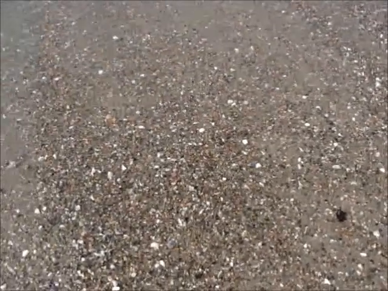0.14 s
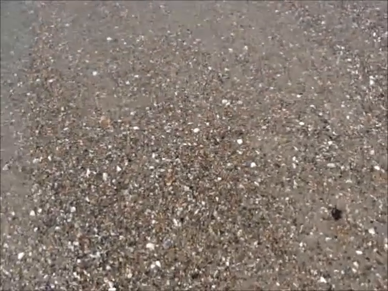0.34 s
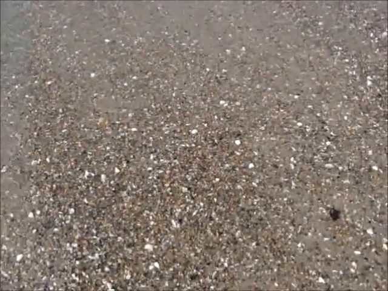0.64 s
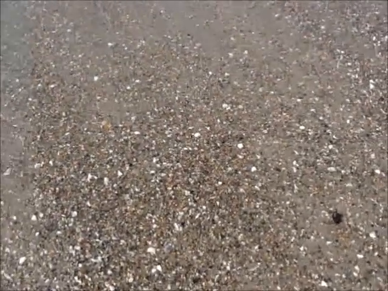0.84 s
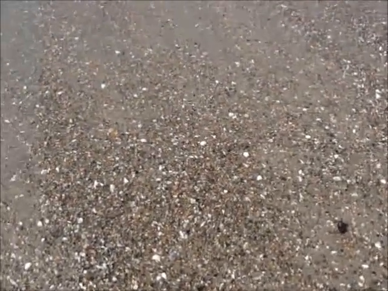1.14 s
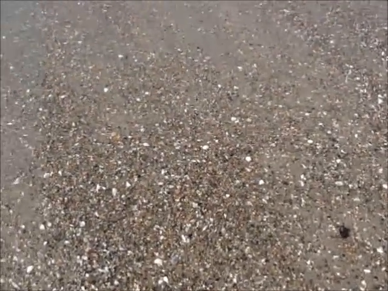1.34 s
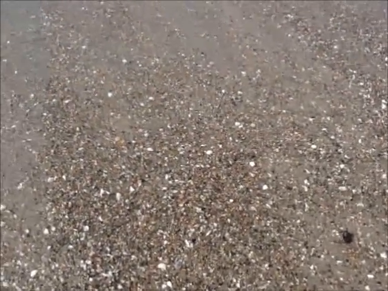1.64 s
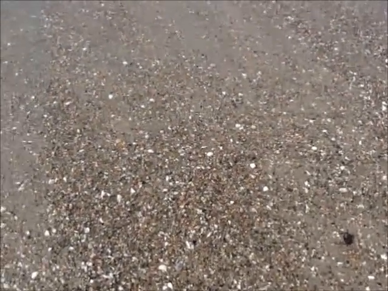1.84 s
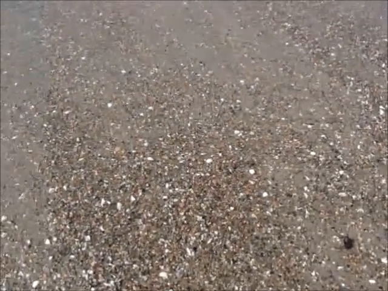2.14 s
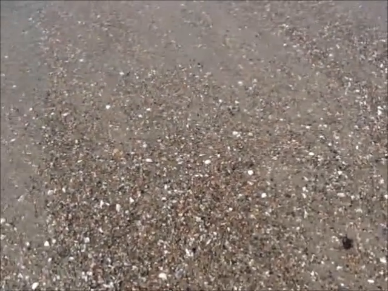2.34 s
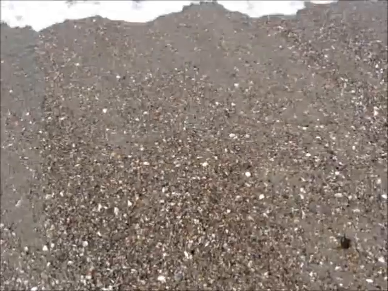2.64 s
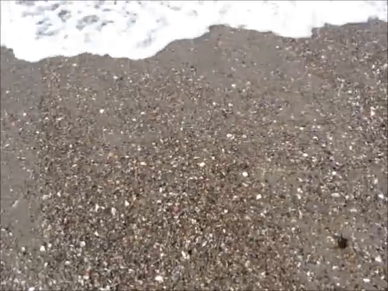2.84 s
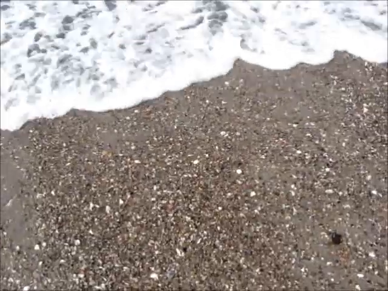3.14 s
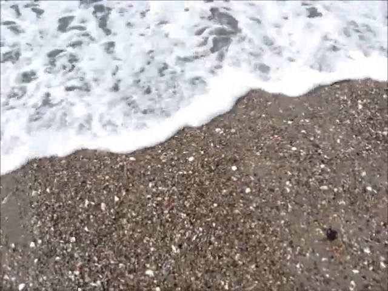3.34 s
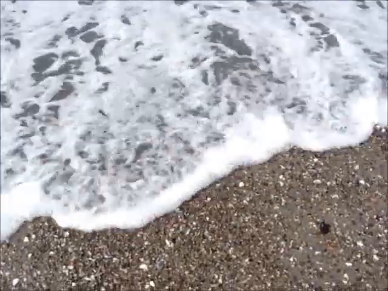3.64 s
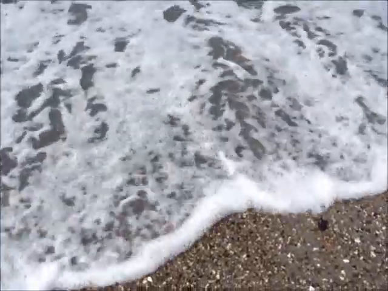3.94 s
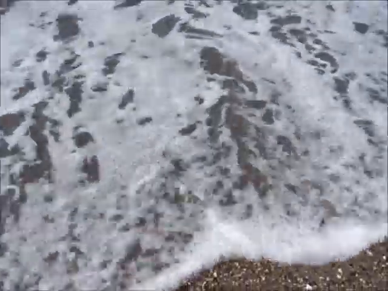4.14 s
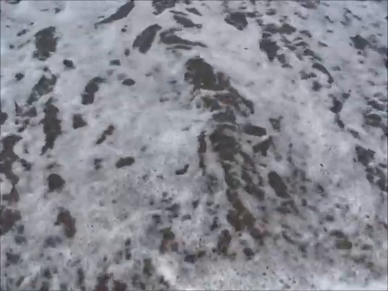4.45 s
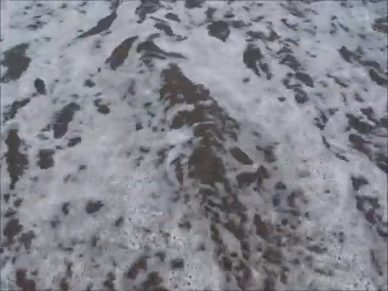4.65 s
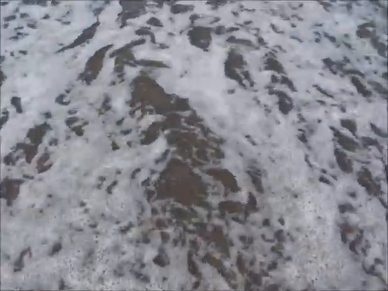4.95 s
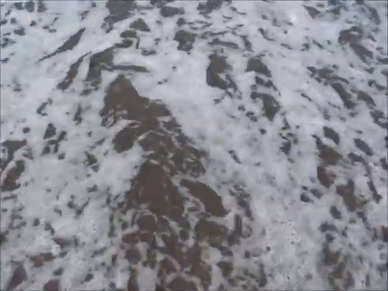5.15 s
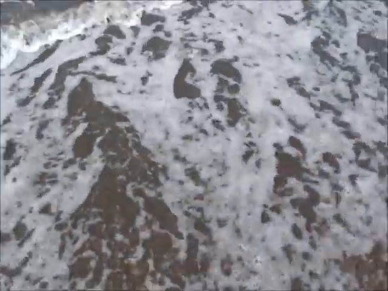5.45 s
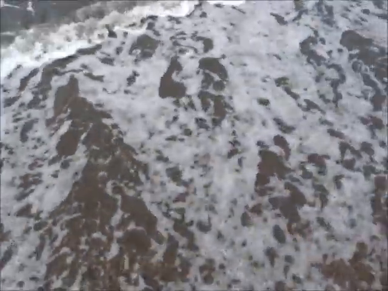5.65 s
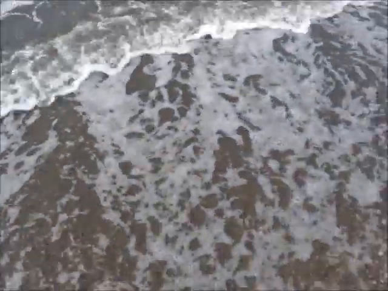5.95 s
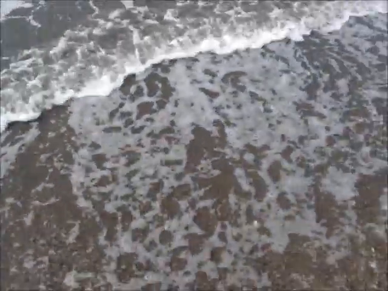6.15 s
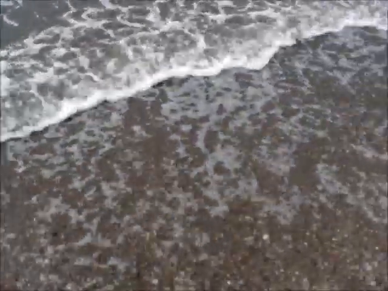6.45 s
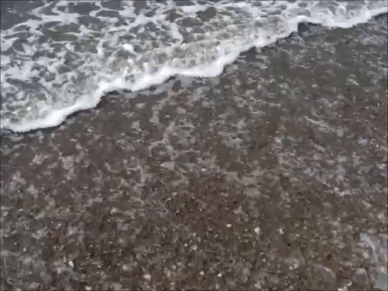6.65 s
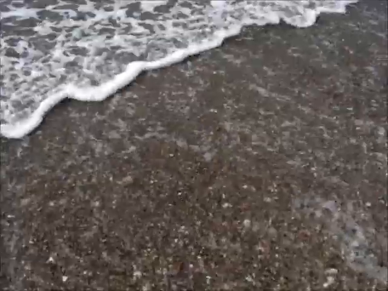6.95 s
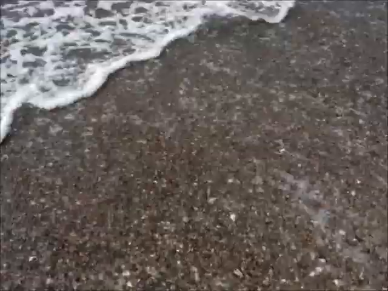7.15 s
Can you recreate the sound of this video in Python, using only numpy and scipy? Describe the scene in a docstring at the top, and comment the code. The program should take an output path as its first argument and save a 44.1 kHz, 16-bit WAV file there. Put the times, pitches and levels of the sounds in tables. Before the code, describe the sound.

A breaking wave roars from the start on a shell and gravel beach, with a hollow boom underneath and small stones clattering in the white water. From about 1 second a fine, high fizz of bursting foam comes in, and from about 1.5 seconds the roar slowly fades, its boom gone by around 3 seconds. Bubbly water runs over the gravel, surging close by from 3.5 to 4.5 seconds, then rising in pitch as it thins away. Around 5.3 seconds a smaller, duller wave falls further out and dies down. The foam keeps fizzing to the end at about 7 seconds, with a faint return of running water. Wind rumbles on the small microphone throughout, lighter at first, with low, irregular thumps from about 2.5 seconds, strongest near 3, 4.7, 5.9 and 6.6 seconds.

```python
"""Surf on a shell and gravel beach, heard by one small microphone in the wind.
First a breaker roars and tumbles the stones, while air trapped under its lip booms hollow. Gusts buffet
the microphone and bubbly water runs over the gravel throughout. After a second, bursting foam starts
to fizz and the roar begins to fade. Near 3.5 s the water surges, its bubbles shrinking as it thins.
Near 5 s a smaller wave falls further out; foam and wind carry on to the end."""
import sys
import numpy as np
from scipy import signal
from scipy.io import wavfile

SR = 44100
rng = np.random.default_rng(int(sys.argv[2]) if len(sys.argv) > 2 else 0)


def file_out(sig):
    """Save sig as 16-bit WAV at sys.argv[1]."""
    # one column per channel
    cols = np.atleast_2d(sig).T
    # limit, then scale
    lim = np.clip(cols, -1, 1)
    pcm = np.round(lim * 32767).astype(np.int16)
    wavfile.write(sys.argv[1], SR, pcm)


N = 321489

# Tone of the breaker's low thunder and of its white water: pitch_hz, relative_db
THUNDER_TONE = [(60, -32), (110, -15), (170, -5), (300, -1), (430, -3), (520, -5), (700, -13.5),
                (1200, -47.5)]
WHITE_WATER_TONE = [(400, -29.5), (580, -12.5), (760, 0.5), (1000, -8), (1500, -3.5), (2200, -9),
                    (2900, -7), (3700, -9), (4600, -12.5), (5600, -8.5), (7200, -10), (10000, -23.5)]
# The boom of air under the curling lip: time_s, level_db, pitch_hz
BOOM_PATH = [(0, -22, 325), (.25, -21, 263), (.5, -26, 290), (.7, -24, 397), (.95, -25.5, 300),
             (1.2, -25, 385), (1.55, -24.5, 304), (1.75, -27, 404), (2.1, -26.5, 440), (2.5, -30.5, 447),
             (2.9, -31, 452), (3.3, -42, 450)]
# Wind strength on the microphone: time_s, buffet_db, deep_swing_db
GUST_LEVELS = [(0, -29.5, -42), (.35, -32, -39), (.7, -40.5, -52), (1.1, -38, -45), (1.4, -32.5, -45),
               (2.0, -29, -36), (2.4, -27.5, -32), (2.85, -31.5, -40), (3.1, -23, -26), (3.5, -29.5, -31),
               (3.75, -26, -26.5), (4.1, -25.5, -31), (4.35, -27.5, -28), (4.6, -23, -31),
               (4.95, -23.5, -33), (5.3, -25.5, -29), (5.6, -24, -30), (5.9, -24, -28.5), (6.3, -24.5, -31),
               (6.85, -23.5, -28), (7.29, -29.5, -28)]
# Tone of the buffeting and of the deep pressure swings: pitch_hz, relative_db
BUFFET_TONE = [(45, -34), (75, -9), (110, 2), (160, -2), (220, -6), (400, -18.5), (700, -17.5),
               (1100, -41.5)]
SWING_TONE = [(15, -26), (30, -7), (55, 1.5), (80, 6), (120, -13), (200, -38)]
# The strongest single swirls of air: time_s, peak_db, pitch_hz
STRONG_SWIRLS = [(2.6, -9.5, 183), (2.704, -13, 153), (2.72, -12, 155), (2.733, -13, 173), (2.968, -9, 200),
                 (2.984, -8.5, 222), (3.005, -8, 230), (3.035, -13, 150), (3.057, -9, 200),
                 (3.082, -10, 135), (3.192, -17, 120), (3.232, -12, 177), (3.315, -12, 110),
                 (3.387, -13, 200), (3.571, -18, 127), (3.613, -14, 116), (3.709, -11.5, 148),
                 (3.904, -15, 175), (4.218, -15, 124), (4.419, -15, 129), (4.47, -13, 130),
                 (4.52, -18, 298), (4.6, -17, 140), (4.617, -11, 146), (4.64, -13, 150), (4.659, -10, 170),
                 (4.72, -12, 95), (4.797, -14, 120), (4.824, -10, 170), (4.91, -14, 110), (4.96, -11, 165),
                 (5.02, -15, 145), (5.13, -14, 85), (5.244, -17, 152), (5.47, -13, 110), (5.531, -17, 120),
                 (5.738, -18, 105), (5.838, -11, 137), (5.891, -7, 141), (5.951, -11, 130),
                 (5.981, -9, 159), (6.065, -13, 145), (6.11, -15, 131), (6.195, -14, 95), (6.305, -13, 143),
                 (6.415, -12, 171), (6.619, -7.5, 156), (6.73, -15, 85), (6.865, -13, 149),
                 (6.896, -15, 123)]
# Water running over gravel, and its typical bubble: time_s, level_db, pitch_hz
WATER_PATH = [(1.0, -26, 2800), (2.5, -24.5, 2500), (3.4, -24, 2720), (3.65, -18.5, 2970), (4.1, -19, 3320),
              (4.5, -21, 3750), (4.65, -25, 3900), (4.85, -29.5, 4000), (5.3, -41, 3380),
              (6.3, -36.5, 3600), (6.6, -31.5, 3930), (7.29, -30, 4000)]
# Loudness of the bursting foam: time_s, level_db
FOAM_LEVELS = [(0, -41), (.9, -40), (1.4, -27), (2.2, -28.5), (2.9, -33), (4.2, -25.5), (4.7, -28),
               (5.7, -26.5), (6.1, -28.5), (6.45, -27), (6.8, -25), (7.29, -25.5)]
# Tone of the foam and of the far wave: pitch_hz, relative_db
FOAM_TONE = [(1500, -33.5), (3000, -3), (4600, -0.5), (5600, 1), (6700, 3), (7800, 14.5), (8800, -5),
             (10000, -33)]
FAR_WAVE_TONE = [(300, -21), (600, 2.5), (1000, -3), (1600, -0.5), (2400, -4.5), (3500, -7), (6000, -39)]

FLUTTER_DB = .5  # how far all bands of a sound swell together at once


def from_db(db):
    """Turn decibels into a factor to multiply by."""
    return 10 ** (np.asarray(db) / 20)


def rms_one(x):
    """Scale a sound to an average strength (rms) of 1."""
    return x / np.sqrt(np.mean(x ** 2) + 1e-20)


def in_time(rows):
    """Join a table's points with lines: one value per sample for each column after the time."""
    times_s, *columns = np.transpose(rows)
    return [np.interp(np.arange(N) / SR, times_s, column) for column in columns]


def after(time_s):
    """Seconds since a moment, zero before it."""
    return np.maximum(np.arange(N) / SR - time_s, 0)


def drift(rate_hz):
    """A slow random wobble of typical size 1."""
    step = 40  # samples per random value
    decay = np.exp(-2 * np.pi * step * rate_hz / SR)
    noise = rng.standard_normal(N // step + 2002)
    slow = signal.lfilter([1], [1, -2 * decay, decay * decay], noise)[2000:]
    return np.interp(np.arange(N) / step, np.arange(len(slow)), rms_one(slow - slow.mean()))


def pops(per_s, spread_db):
    """Random clicks of uneven size and either sign."""
    sizes = from_db(spread_db * np.minimum(rng.exponential(1, N), 5)) * rng.choice([-1, 1], N)
    return sizes * (rng.random(N) < per_s / SR)


def ring(pushes, hz, cycles):
    """Each push rings at one pitch and dies by 60 dB in so many cycles."""
    decay, angle = from_db(-60 * hz / (cycles * SR)), 2 * np.pi * hz / SR
    return signal.lfilter([0, np.sin(angle)], [1, -2 * decay * np.cos(angle), decay ** 2], pushes + 1e-18)


def shaped_noise(tone, own_db, rate_hz, shared_db=FLUTTER_DB, sources=None):
    """Give hiss (or two given sounds) a tone, in bands that swell partly together, partly alone."""
    if sources is None:
        sources = rng.standard_normal((2, N))
    hz, db = np.transpose(tone)
    edges = hz[0] * 2 ** np.arange(0, np.log2(hz[-1] / hz[0]) + 1 / 3, 1 / 3)
    out, together = 0, drift(rate_hz)
    for k, (low, high) in enumerate(zip(edges, edges[1:])):
        band = signal.sosfilt(signal.butter(2, [low, high], "band", fs=SR, output="sos"), sources[k % 2])
        level_db = np.interp(np.log(low * high) / 2, np.log(hz), db)
        out = out + band * from_db(level_db + shared_db * together + own_db * drift(rate_hz))
    return rms_one(out)


def breaker(fade_s=1.48, drain_s=2.78, dip_hz=556, dip_width_hz=69, dip_db=-2):
    """Collapsing air pockets thunder low; white water roars above them and tumbles the stones."""
    # Both hold, then fade by so many dB a second into the steady sound of the surf.
    thunder_gain = np.hypot(from_db(-22 - 6.5 * after(fade_s)), from_db(-31))
    water_gain = np.hypot(from_db(-17.5 - 3.5 * after(fade_s) - 8 * after(drain_s)), from_db(-46.5))
    thunder = shaped_noise(THUNDER_TONE, own_db=2.5, rate_hz=11.6)
    white_water = shaped_noise(WHITE_WATER_TONE, own_db=1.7, rate_hz=20)
    roar = thunder_gain * thunder + water_gain * (white_water + from_db(-3) * pebbles())
    # A narrow dip sets the thunder apart from the white water.
    dip_band = signal.lfilter(*signal.iirpeak(dip_hz, dip_hz / dip_width_hz, fs=SR), roar)
    return roar - (1 - from_db(dip_db)) * dip_band


def pebbles(clump_db=2.5, db_per_octave=-.5):
    """Stones and shells knock together in clumps, each ringing briefly; small ones are fainter."""
    knocks = pops(3200 * from_db(clump_db * drift(14)), spread_db=2.4)
    stone = rng.integers(0, 40, N)
    out = 0
    for k, hz in enumerate(np.geomspace(500, 8500, 40)):
        gain = from_db(db_per_octave * np.log2(hz / 500)) * np.sqrt(hz)
        out += gain * ring(knocks * (stone == k), hz, cycles=70)
    return rms_one(out)


def hollow_boom(spread_octaves=.27):
    """Churning water rings the air pockets trapped under the wave's curling lip."""
    level_db, typical_hz = in_time(BOOM_PATH)
    churn = rng.standard_normal((2, N))
    out, power = 0, 1e-9
    for k, hz in enumerate(np.geomspace(170, 680, 11)):
        weight = np.exp(-.5 * (np.log2(hz / typical_hz) / spread_octaves) ** 2)
        out += weight * rms_one(ring(churn[k % 2], hz, cycles=21.7))
        power += weight ** 2
    out = signal.sosfilt(signal.butter(4, 140, "high", fs=SR, output="sos"), out)
    return from_db(level_db + 2.3 * drift(9)) * out / np.sqrt(power)


def wind(weak_count=14, swirl_hz=127, spread_octaves=.32, half_width_cycles=.72):
    """Swirling air rumbles on the microphone; single swirls thump its membrane to and fro once."""
    buffet_db, swing_db = in_time(GUST_LEVELS)
    out = from_db(buffet_db) * shaped_noise(BUFFET_TONE, own_db=.8, rate_hz=19, shared_db=1.85)
    out += from_db(swing_db) * shaped_noise(SWING_TONE, own_db=1.2, rate_hz=9.1, shared_db=1)
    # Weaker swirls come at random and peak 5 dB over the buffeting.
    at = rng.integers(0, N, weak_count)
    weak_hz = swirl_hz * 2 ** (spread_octaves * rng.standard_normal(weak_count))
    swirls = list(zip(at / SR, buffet_db[at] + 5, weak_hz)) + list(STRONG_SWIRLS)
    for time_s, peak_db, hz in swirls:
        middle = int(time_s * SR)
        near = np.arange(max(middle - 2000, 0), min(middle + 2000, N))
        cycles = (near / SR - time_s) * hz
        swell = from_db(peak_db) * np.exp(-(cycles / half_width_cycles) ** 2)
        out[near] += swell * np.cos(2 * np.pi * cycles + rng.uniform(0, 2 * np.pi))
    return out


def running_water(octaves_above=.49, octaves_below=.48):
    """Water runs up the stones full of briefly ringing bubbles; smaller bubbles ring higher."""
    level_db, typical_hz = in_time(WATER_PATH)
    clicks = pops(24000, spread_db=1.2)
    bubble = rng.integers(0, 24, N)
    out, power = 0, 0
    for k, hz in enumerate(np.geomspace(1200, 8000, 24)):
        octaves = np.log2(hz / typical_hz)
        spread = np.where(octaves > 0, octaves_above, octaves_below)
        weight = np.exp(-.5 * (octaves / spread) ** 2)
        out += weight * rms_one(ring(clicks * (bubble == k), hz, cycles=16))
        power += weight ** 2
    return from_db(level_db + FLUTTER_DB * drift(16)) * out / np.sqrt(power)


def foam():
    """Countless tiny films of water burst in a fine fizz."""
    crackle = [pops(25000, spread_db=3.8) for _ in range(2)]
    fizz = shaped_noise(FOAM_TONE, own_db=1.2, rate_hz=10, sources=crackle)
    return from_db(in_time(FOAM_LEVELS)[0]) * fizz


def far_wave(peak_s=5.334, peak_db=-27, rise_db_per_s=28, fade_db_per_s=9.5):
    """A smaller wave falls further out; distance smooths and dulls its roar."""
    roar = shaped_noise(FAR_WAVE_TONE, own_db=2.5, rate_hz=21)
    before = np.maximum(peak_s - np.arange(N) / SR, 0)
    return from_db(peak_db - rise_db_per_s * before - fade_db_per_s * after(peak_s)) * roar


def scene():
    """One microphone hears everything and feeds both channels."""
    mix = breaker() + hollow_boom() + wind() + running_water() + foam() + far_wave()
    return np.tile(mix, (2, 1))


def record(dry, droop_hz=10160, ceiling=1.8, cutoff_hz=10040):
    """The microphone softens the highest treble, peaks are rounded, then the top is cut off."""
    softened = signal.sosfilt(signal.butter(4, droop_hz, fs=SR, output="sos"), dry)
    rounded = ceiling * np.tanh(softened / ceiling)
    return signal.sosfilt(signal.ellip(14, .2, 85, cutoff_hz, fs=SR, output="sos"), rounded)


dry = scene()
out = record(dry)
file_out(out)
```